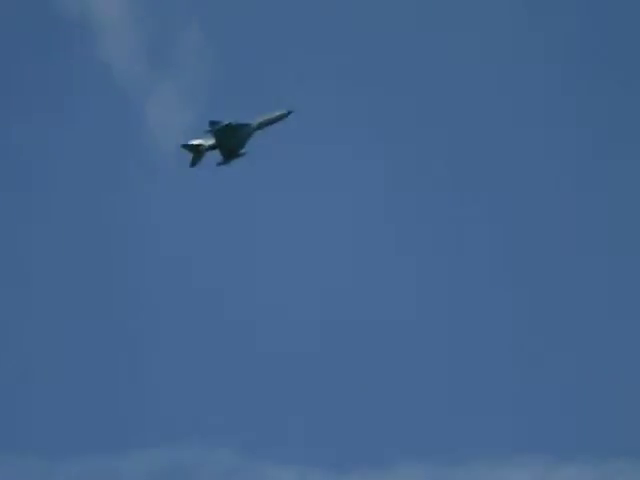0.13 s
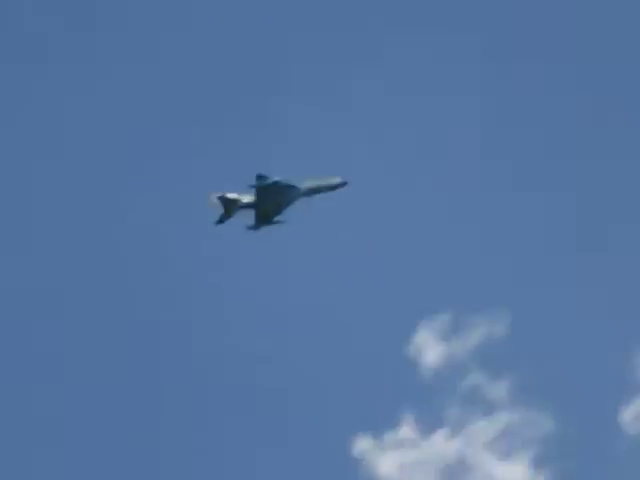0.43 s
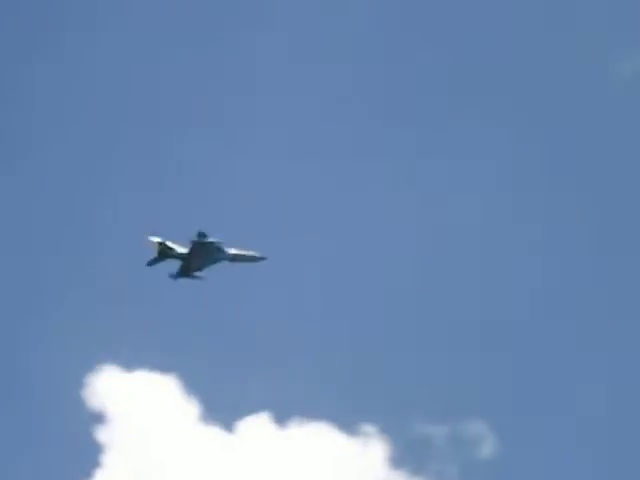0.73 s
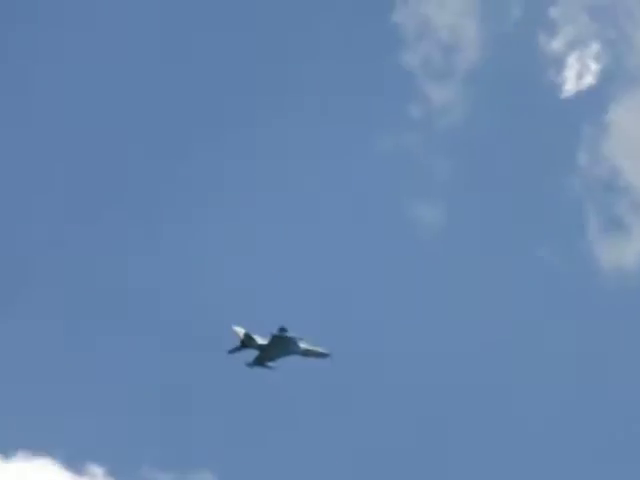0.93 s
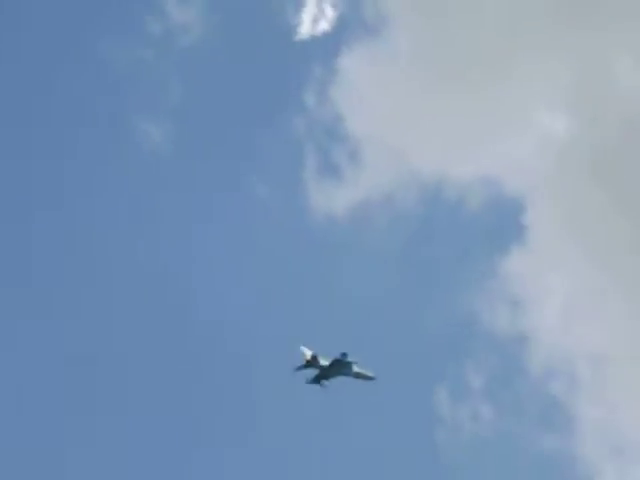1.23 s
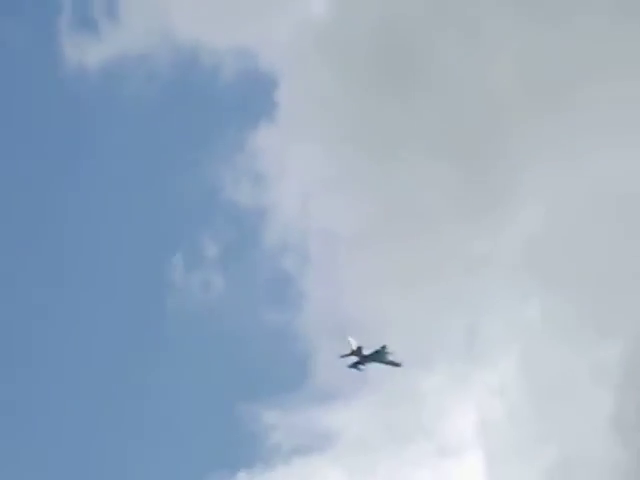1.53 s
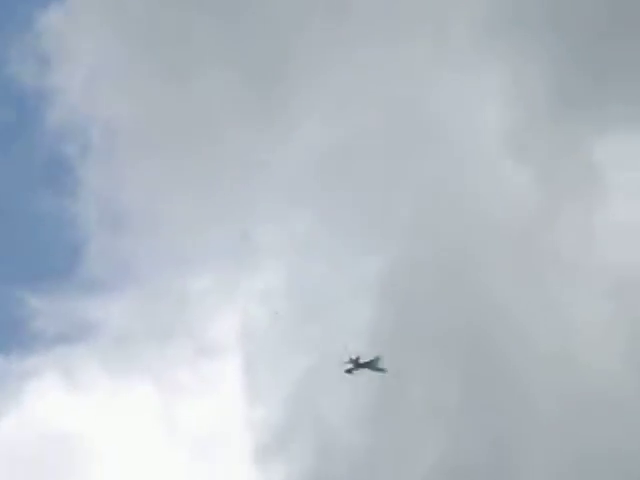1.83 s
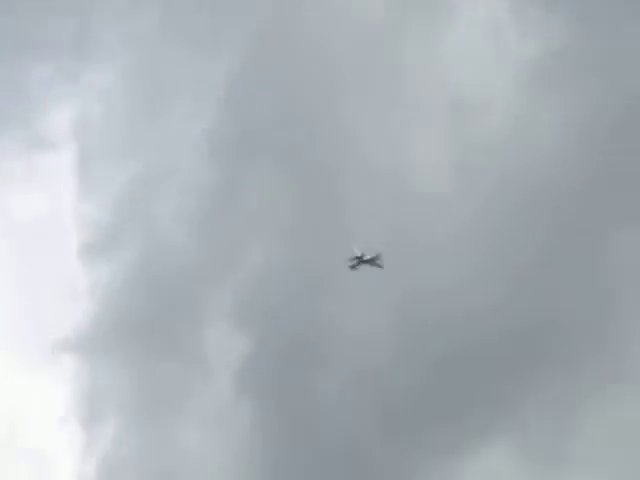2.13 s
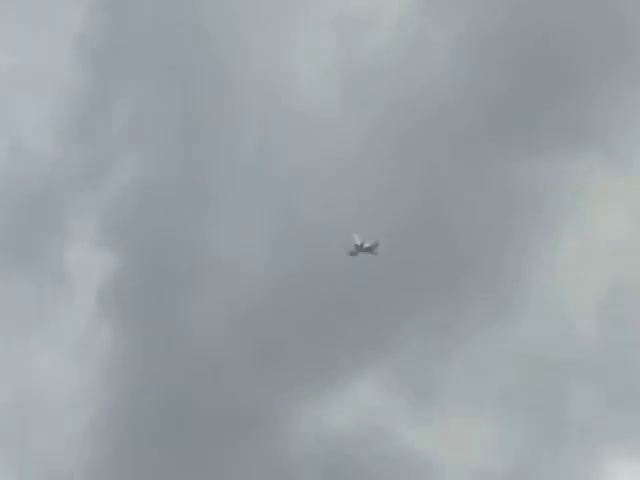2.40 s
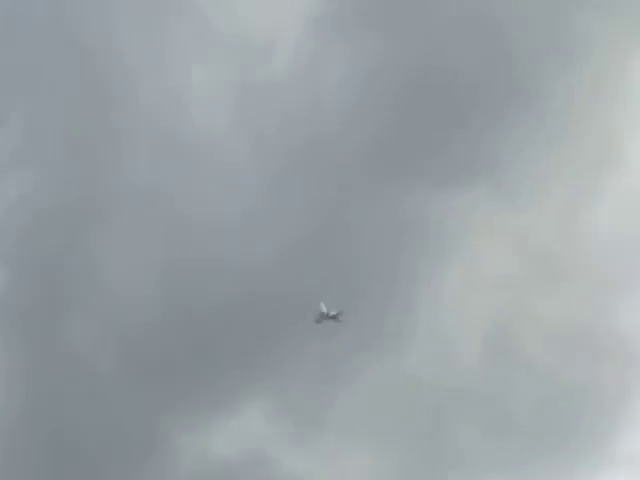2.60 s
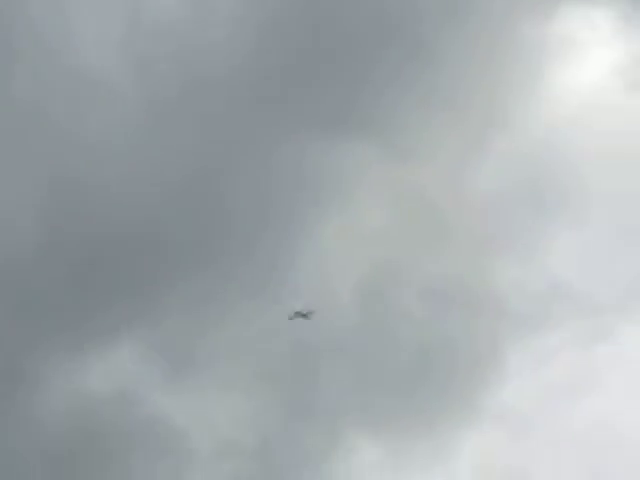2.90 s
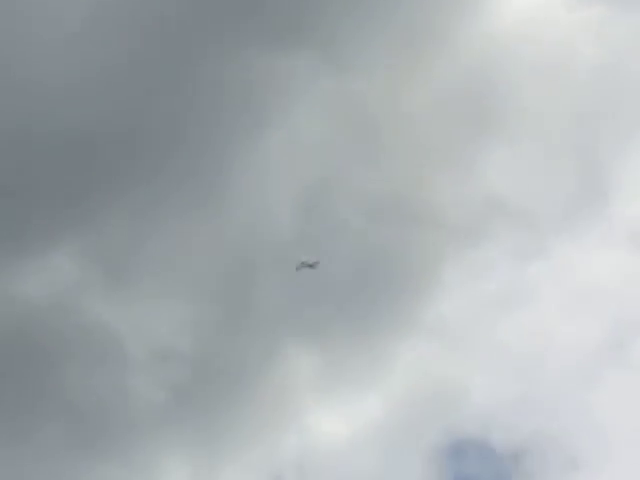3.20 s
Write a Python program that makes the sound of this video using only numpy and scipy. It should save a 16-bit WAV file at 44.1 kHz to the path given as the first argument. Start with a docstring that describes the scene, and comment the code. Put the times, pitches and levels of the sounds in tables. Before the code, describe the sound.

A fighter jet passes outdoors, first a fluttering, tearing hiss with a short howl, then deep crackling roar with two quick blasts as it turns away; small ringing microphone overloads, with low wind buffeting.

```python
"""Air display: a fighter jet passes low and turns away. Modulated noise makes its tearing hiss; a brief howl is
noise shifted up to a rising pitch. As the exhaust swings toward the listener, low noise deepens the roar,
random pressure spikes crackle and noise bursts blast through: two with their own spectrum, two more as sharp
surges of the hiss. A delayed copy, the ground echo, sweeps a comb through it all. Low wind noise buffets a
small microphone that rings near 3 kHz and overloads on the loudest parts."""
import sys
import numpy as np
from scipy import signal
from scipy.fft import rfft, irfft, next_fast_len
from scipy.io import wavfile
from scipy.ndimage import map_coordinates

SR = 44100
rng = np.random.default_rng(int(sys.argv[2]) if len(sys.argv) > 2 else 0)


def wav_record(signal):
    """Record a signal, one row per channel, as 16-bit PCM in the file named by sys.argv[1]."""
    frames = np.transpose(np.atleast_2d(signal))
    bounded = np.clip(frames, -1, 1)
    # unit amplitude maps onto the largest positive 16-bit level
    quanta = np.round(bounded * 32767).astype(np.int16)
    wavfile.write(sys.argv[1], SR, quanta)


N = 147735


def amp(db):
    """Decibels to gain."""
    return 10 ** (np.asarray(db) / 20)


def unit(x):
    """Scale to rms 1."""
    return x / np.sqrt(np.mean(x ** 2) + 1e-20)


def along(points, hz):
    """Interpolate (frequency [Hz], value) points on a log frequency axis."""
    point_hz, values = np.transpose(points)
    return np.interp(np.log(hz + 1), np.log(point_hz + 1), values)


def curve(points):
    """Interpolate (time [s], value) points to one value per sample."""
    return np.interp(np.arange(N) / SR, *np.transpose(points))


def wobble(knots_per_s):
    """Smooth random curve through normally distributed knots."""
    knots = rng.standard_normal(int(N * knots_per_s / SR) + 4)
    return map_coordinates(knots, [np.arange(N) * knots_per_s / SR])


def filtered(x, response):
    """Multiply the spectrum of x by response(hz)."""
    size = next_fast_len(N + SR // 2)  # zero padding leaves room for the ringing
    hz = np.fft.rfftfreq(size, 1 / SR)
    return irfft(rfft(x, size) * response(hz), size)[:N]


def noise(spectrum):
    """Coloured noise of rms 1."""
    white = rng.standard_normal(N)
    return unit(filtered(white, lambda hz: amp(along(spectrum, hz))))


def causal(gain):
    """Minimum-phase response with these gains: it rings only after its input."""
    cepstrum = irfft(np.log(gain))
    half = len(cepstrum) // 2
    cepstrum[1:half] *= 2
    cepstrum[half + 1:] = 0
    return np.exp(rfft(cepstrum))


# Hiss spectrum: (frequency [Hz], level [dB])
HISS_SPECTRUM = [(60, -19), (300, -7), (700, -4), (1500, 0.5), (3200, -1.5), (6000, -3), (9000, -34.5)]


def hiss(flutter_db=1.82, rasp_db=2.01):
    """Fine exhaust turbulence: noise with slow flutter and fast rasp in level, rms 1."""
    level_db = flutter_db * wobble(45) + rasp_db * wobble(420)
    return unit(noise(HISS_SPECTRUM) * amp(level_db))


# Shock level relative to the hiss: (time [s], level [dB])
CRACKLE_LEVEL = [(0, -21.5), (1.1, -7), (1.5, 0), (2.0, 4), (2.4, -3), (3.35, -1)]
SHOCKS_PER_S, SHOCK_SPREAD_DB = 450, 3
SHOCK_RELAX_HZ, SHOCK_EDGE_HZ = 60, 5530


def crackle():
    """Irregular one-sided shocks: each a sharp pressure spike followed by a small undershoot that relaxes."""
    strikes = rng.random(N) < SHOCKS_PER_S / SR
    sizes = amp(SHOCK_SPREAD_DB * np.clip(rng.standard_normal(N), -2, 2))

    def shock_shape(hz):
        highpass = 1j * hz / (1j * hz + SHOCK_RELAX_HZ)
        lowpass = 1 / (1 + 1j * hz / SHOCK_EDGE_HZ)
        return highpass * lowpass

    shocks = -unit(filtered(strikes * sizes, shock_shape))
    return shocks * amp(curve(CRACKLE_LEVEL))


# Howl level relative to the hiss: (time [s], level [dB])
HOWL_LEVEL = [(0, -3), (.15, -4), (.32, -5), (.55, -11.5), (.8, -14), (1.3, -40.5)]
HOWL_START_HZ, HOWL_RISE_HZ_PER_S, HOWL_HALF_WIDTH_HZ = 835.4, 470, 202


def howl(flicker_db=2.0, waver_hz=45):
    """Shock cells in the exhaust: a wavering noise band that climbs as the jet nears."""
    pitch_hz = HOWL_START_HZ + HOWL_RISE_HZ_PER_S * np.arange(N) / SR + waver_hz * wobble(25)
    low_noise = filtered(rng.standard_normal(N), lambda hz: 1 / (1 + (hz / HOWL_HALF_WIDTH_HZ) ** 2))
    carrier = np.cos(2 * np.pi * np.cumsum(pitch_hz) / SR)
    band = low_noise * carrier * amp(flicker_db * wobble(35))
    return unit(band) * amp(curve(HOWL_LEVEL))


# Swell and fade in turbulent air, with two further blasts at 2.385 and 2.655 s, before trim: (time [s], level
# [dB])
TEARING_LEVEL = [(0, -21), (.18, -17.5), (.28, -18), (.333, -14), (.35, -26), (.38, -21.5), (.41, -16.5),
                 (.45, -16), (.48, -20.5), (.52, -17), (.55, -13), (.585, -26.5), (.63, -28), (.688, -21),
                 (.697, -19), (.78, -17), (.88, -15.5), (.92, -18.5), (.965, -12), (1.0, -18.5),
                 (1.08, -18), (1.125, -16), (1.16, -17.5), (1.2, -15.5), (1.31, -22), (1.35, -20.5),
                 (1.43, -21.5), (1.6, -24), (1.69, -17.5), (1.76, -21.5), (1.82, -25), (1.96, -21),
                 (2.04, -24), (2.11, -16), (2.21, -12.5), (2.3, -23), (2.35, -15), (2.385, -6.5),
                 (2.44, -23), (2.54, -13), (2.6, -14.5), (2.655, -7.5), (2.72, -20), (2.83, -15.5),
                 (2.98, -26), (3.04, -23), (3.1, -25), (3.16, -28), (3.235, -16.5), (3.28, -23),
                 (3.35, -34)]


def tearing(trim_db=-2):
    """Hiss, crackle and howl swell and fade together in the turbulent air and surge in two further blasts."""
    return (hiss() + crackle() + howl()) * amp(curve(TEARING_LEVEL) + trim_db)


# Roar level before trim: (time [s], level [dB])
ROAR_LEVEL = [(0, -37.5), (.15, -29.5), (.45, -32), (.63, -37), (.92, -25), (1.2, -30), (1.35, -23.5),
              (1.6, -23.5), (1.8, -17), (2.04, -19.5), (2.1, -8), (2.42, -11.5), (2.66, -8), (2.75, -12),
              (2.93, -13), (3.1, -17.5), (3.35, -23.5)]
# Roar spectrum: (frequency [Hz], level [dB])
ROAR_SPECTRUM = [(8, -34.5), (30, -12.5), (65, -4), (110, -3), (155, 0.5), (230, -2), (400, -3),
                 (580, -8.5), (780, -11), (1400, -18), (3000, -34), (6000, -48.5)]


def roar(churn_db=0.75, trim_db=-1):
    """Large exhaust eddies: low noise, churning in level."""
    level_db = curve(ROAR_LEVEL) + churn_db * wobble(25.05) + trim_db
    return noise(ROAR_SPECTRUM) * amp(level_db)


# Exhaust blasts: (start [s], hold from start [s], release [s], level [dB])
BLASTS = [(1.854, 0.034, 0.03, -3), (2.059, 0.029, 0.062, -4.5)]
# Blast spectrum: (frequency [Hz], level [dB])
BLAST_SPECTRUM = [(8, -13.5), (35, 19), (100, 8), (400, 14.5), (1000, 8.5), (2200, 6), (3200, 5),
                  (4500, 7.5), (9000, -26.5)]
BLAST_ATTACK_S = 0.0018


def blasts():
    """Bursts of exhaust noise: steep onset, brief hold, exponential decay."""
    t = np.arange(N) / SR
    envelope = np.zeros(N)
    for start_s, hold_s, release_s, level_db in BLASTS:
        attack = np.clip((t - start_s) / BLAST_ATTACK_S, 0, 1)
        decay = np.exp(-2 * np.maximum(t - start_s - hold_s, 0) / release_s)
        envelope += amp(level_db) * attack * decay
    return noise(BLAST_SPECTRUM) * envelope


AIR_LOSS_DB_PER_KHZ_S, RECEDES_S = 1.12, 1.42


def air(x, corner_hz=2500):
    """Treble absorption above the corner, growing with time as the jet draws away."""
    hz, t, bins = signal.stft(x, SR, nperseg=512)
    khz_above = np.maximum(hz - corner_hz, 0) / 1000
    receding_s = np.maximum(t - RECEDES_S, 0)
    loss_db = AIR_LOSS_DB_PER_KHZ_S * np.outer(khz_above, receding_s)
    return signal.istft(bins * amp(-loss_db), SR, nperseg=512)[1][:N]


# Ground echo delay, longest when the jet is highest: (time [s], delay [ms])
ECHO_DELAY_MS = [(0, 6.2), (.35, 7.8), (.7, 9.0), (1.0, 9.8), (1.25, 10.0), (1.6, 9.5), (2.0, 8.5),
                 (2.6, 7.4), (3.35, 6.5)]
# Ground reflection: (frequency [Hz], amplitude share [0-1])
ECHO_SHARE = [(100, 0.7), (600, 0.41), (1500, 0.27), (4000, .25)]


def ground(x):
    """Direct sound plus ground echo: a comb that sweeps down and up again."""
    bounced = filtered(x, lambda hz: np.clip(along(ECHO_SHARE, hz), 0, 1))
    read_at = np.arange(N) - curve(ECHO_DELAY_MS) * SR / 1000
    return x + map_coordinates(bounced, [read_at], mode="mirror")


# Wind on the microphone: (time [s], level [dB])
WIND_LEVEL = [(0, -41), (.08, -32), (.2, -48), (1.58, -55), (1.7, -30.5), (2.4, -29.5), (2.8, -31),
              (3.19, -21.5), (3.26, -32), (3.35, -24)]
# Wind spectrum: (frequency [Hz], level [dB])
WIND_SPECTRUM = [(6, -22), (18, -8), (35, -9), (60, -9.5), (120, -15.5), (500, -60.5)]


def wind(gust_db=0.5):
    """Low buffets of air on the microphone: gusting low noise."""
    gusts = unit(noise(WIND_SPECTRUM) * amp(gust_db * wobble(14)))
    return gusts * amp(curve(WIND_LEVEL))


def scene():
    """The jet through air and over ground, plus wind."""
    jet = tearing() + roar() + blasts()
    return (ground(air(jet)) + wind())[None]


def saturate(x, top, order):
    """Flatten peaks at top; a higher order gives a harder knee."""
    return x / (1 + np.abs(x / top) ** order) ** (1 / order)


# Microphone resonance: (frequency [Hz], gain [dB])
MIC_RESPONSE = [(20, 1), (1800, -2), (2400, 0.5), (2900, 4.5), (3100, 9), (3270, 10.5), (3480, 6),
                (3900, -1.5), (4400, -7.5), (5100, -14), (6500, -13.5)]
# Narrow passband after the overload: (frequency [Hz], gain [dB])
PASSBAND = [(4000, 0.5), (5100, 2.5), (5500, -12.5), (6100, -23), (6500, -53.5)]
OVERLOAD_LEVEL, CLIP_LEVEL, TOP_HZ = 0.8, 0.73, 15800  # levels: 1 = full scale


def record(dry):
    """The microphone rings and overloads; then treble is cut and remaining peaks clip."""
    ringing = filtered(dry[0], lambda hz: causal(amp(along(MIC_RESPONSE, hz))))
    overloaded = saturate(ringing, OVERLOAD_LEVEL, order=4)
    narrowed = filtered(overloaded, lambda hz: amp(along(PASSBAND, hz)))
    clipped = saturate(narrowed, CLIP_LEVEL, order=30)
    return filtered(clipped, lambda hz: hz < TOP_HZ)[None]


dry = scene()
out = record(dry)
wav_record(out)
```